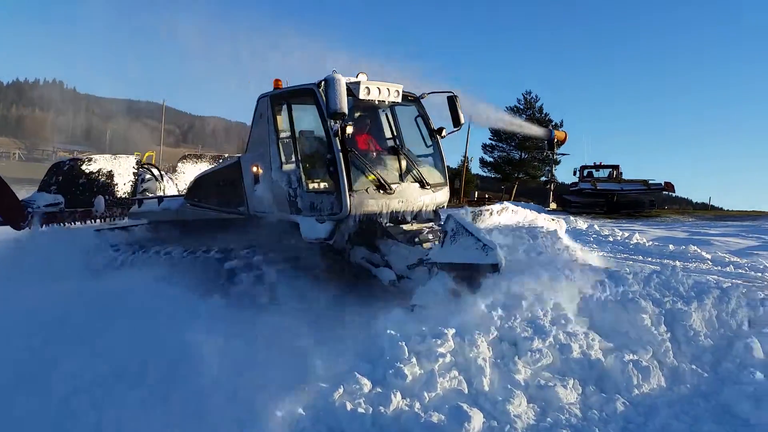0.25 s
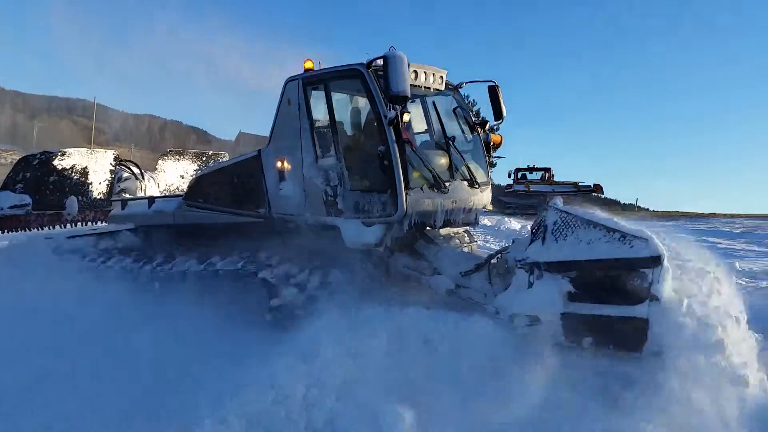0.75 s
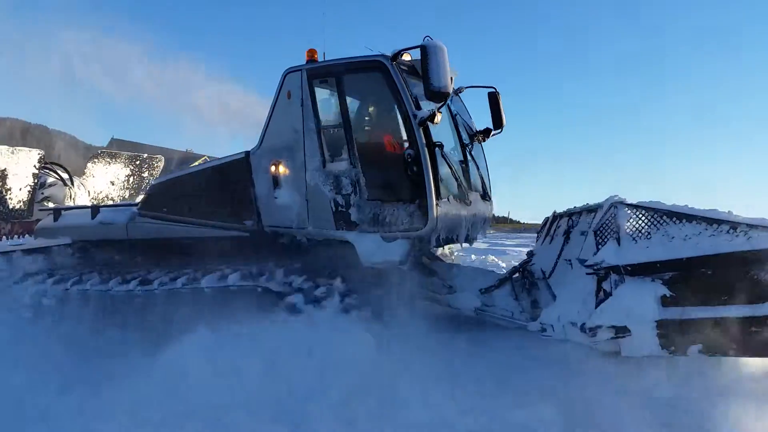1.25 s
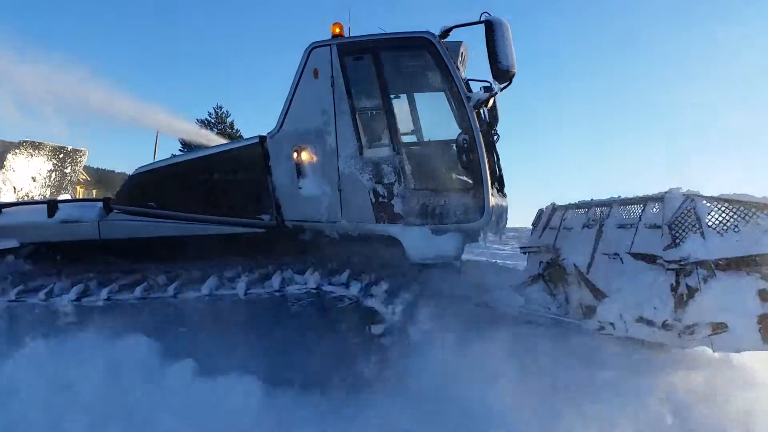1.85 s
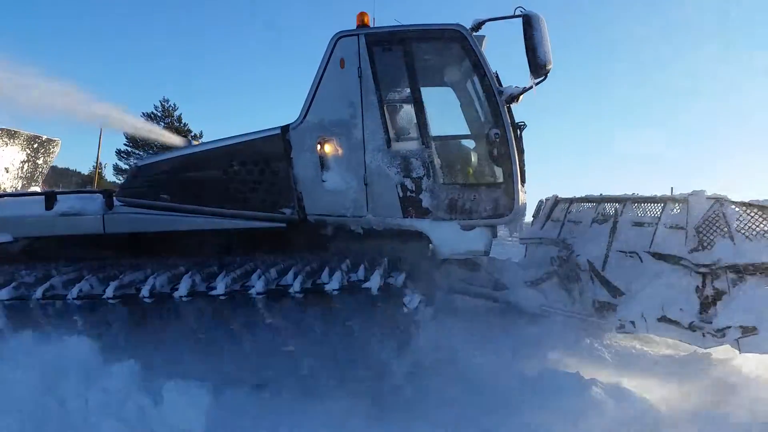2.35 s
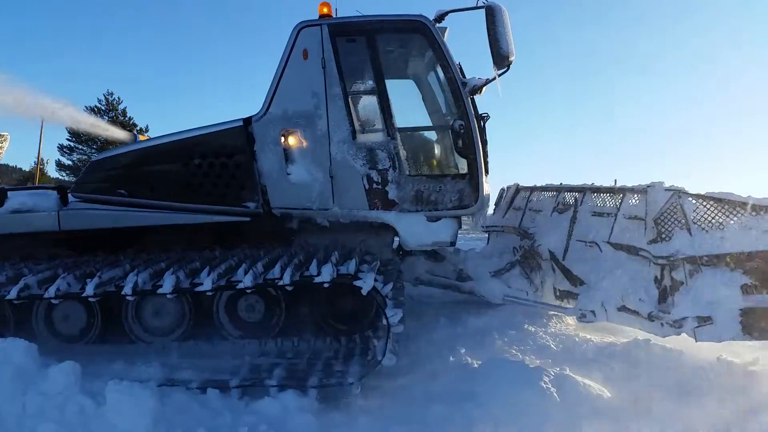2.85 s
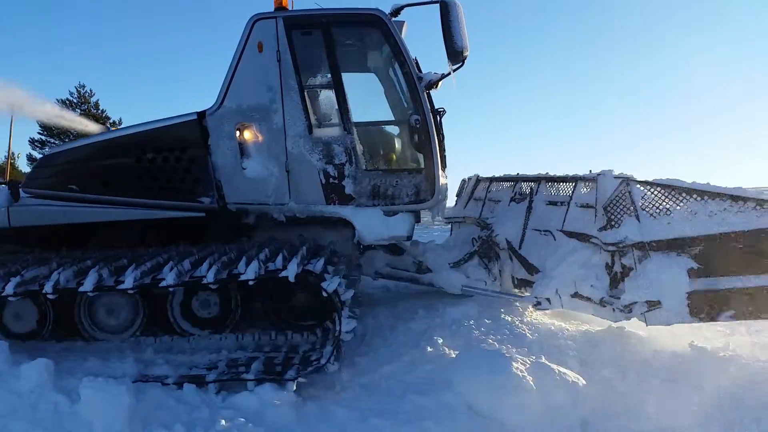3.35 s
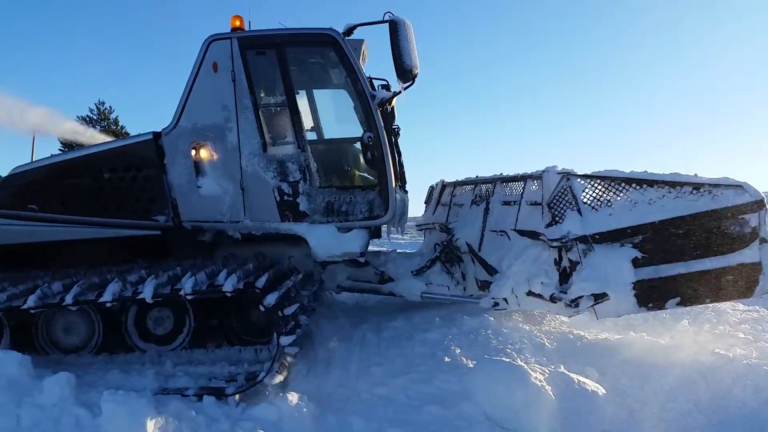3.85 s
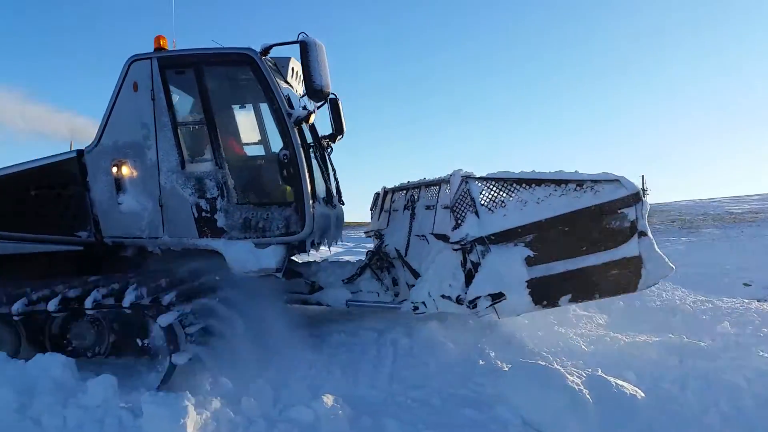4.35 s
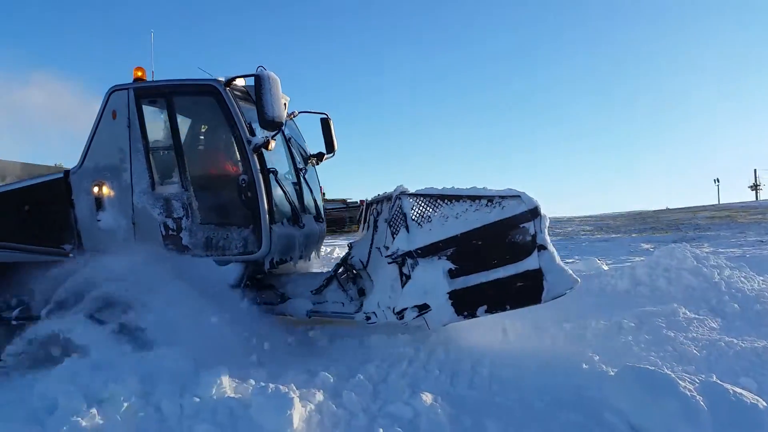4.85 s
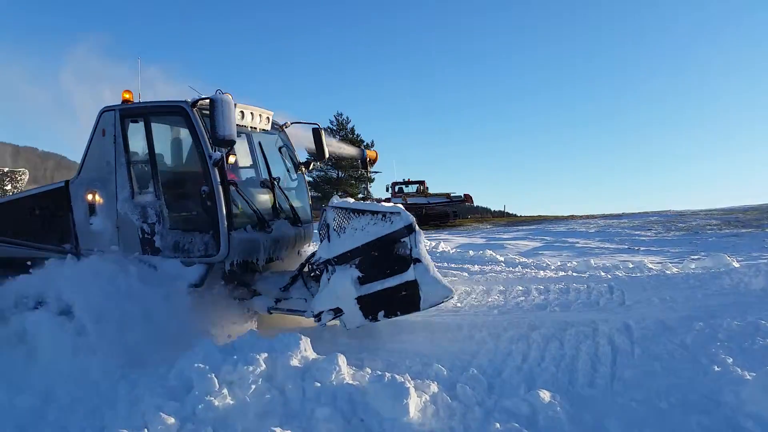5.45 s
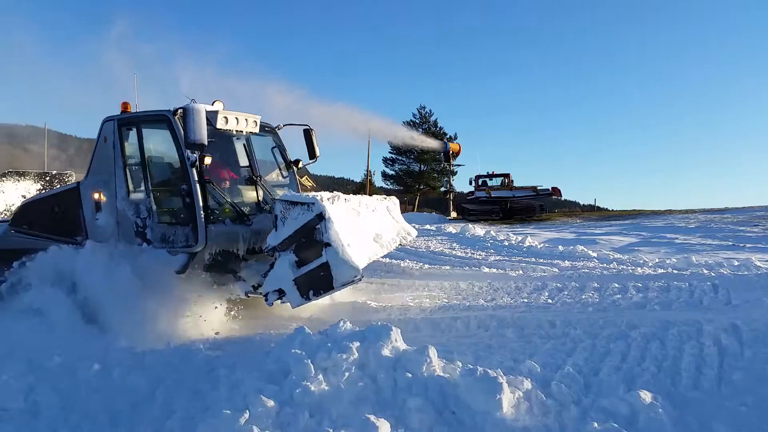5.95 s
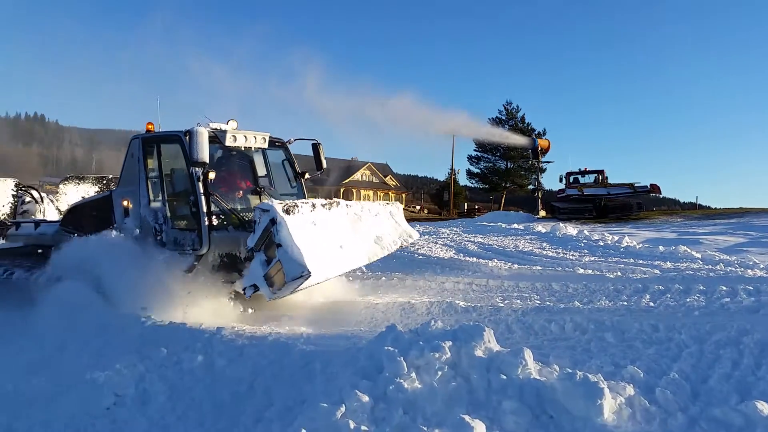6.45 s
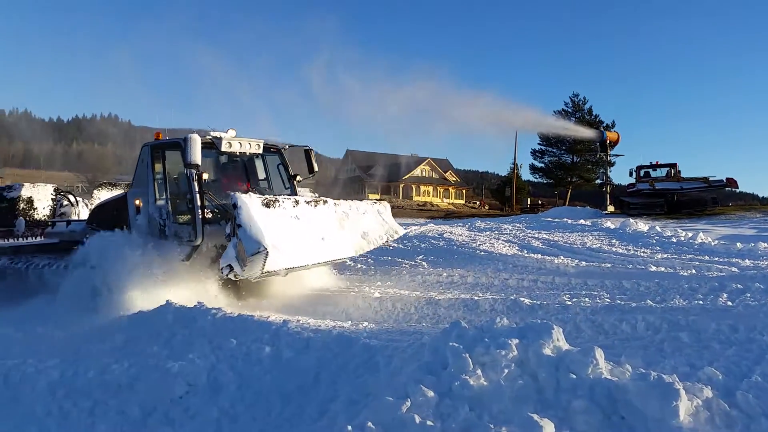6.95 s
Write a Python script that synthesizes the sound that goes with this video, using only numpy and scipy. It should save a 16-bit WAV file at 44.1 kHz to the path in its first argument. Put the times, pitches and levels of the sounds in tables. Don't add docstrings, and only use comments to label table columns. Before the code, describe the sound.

A snow groomer's diesel growls under load with a faint high turbo whistle that slides down as the engine bogs. It picks up with a bark, peaks in a whining roar, then drops back to a steady growl. Crisp snow hiss, cleat knocks and small squeaks follow during reversing. Behind is a wavering fan hum; close stereo phone pickup with rumbling, clipping wind gusts.

```python
import sys
import numpy as np
from scipy import signal
from scipy.fft import rfft, irfft
from scipy.io import wavfile
from scipy.ndimage import uniform_filter1d, minimum_filter1d, map_coordinates

SR = 44100
rng = np.random.default_rng(int(sys.argv[2]) if len(sys.argv) > 2 else 0)


def dump(signal):
    limited = np.clip(np.atleast_2d(signal).T, -1, 1)
    pcm = np.round(limited * 32767).astype(np.int16)
    wavfile.write(sys.argv[1], SR, pcm)


def field_ratio(decibels):
    return 10 ** (np.asarray(decibels, dtype=float) / 20)


N = 316638
TIME = np.arange(N) / SR


def evened(x):
    return x / np.sqrt(np.mean(x ** 2) + 1e-20)


def read(points, hz):
    f, *values = np.transpose(points)
    return np.squeeze([np.interp(np.log(hz + 1), np.log(f + 1), v) for v in values])


def follow(rows, t=TIME):
    s, *columns = np.transpose(rows)
    return [np.interp(t, s, c) for c in columns]


def drift(rate, length=N):
    knots = rng.standard_normal(int(N / SR * rate) + 4)
    places = np.linspace(1, len(knots) - 2, length)
    return evened(map_coordinates(knots, [places], order=2, prefilter=False))


def swell(t, s, length):
    return np.exp(-((t - s) / length) ** 2)


def swells(t, rows):
    return sum(db * swell(t, s, length) for s, length, db in rows)


def shading(t, hz, rows):
    return sum(db * swell(hz, mid_hz, width_hz) * swell(t, s, length)
               for s, length, mid_hz, width_hz, db in rows)


def hump(hz, lo_hz, hi_hz):
    return 1 / (1 + (lo_hz / (hz + 1)) ** 8) / (1 + (hz / hi_hz) ** 8)


def tone(hz, db, lead, left_db, waver_db=-1.0, rate=9):
    turn = 2 * np.pi * (np.cumsum(hz * np.ones(N)) / SR + rng.random())
    level = np.sqrt(2) * field_ratio(db + waver_db * drift(rate))
    left = field_ratio(left_db / 2) * np.sin(turn + lead)
    right = field_ratio(-left_db / 2) * np.sin(turn)
    return level * np.array([left, right])


def whistle(hz, db, width_hz, lead, left_db, steady=.5):
    return tone(hz, db, lead, left_db) * evened(steady + drift(width_hz))


# time in seconds, firing rate in Hz, exhaust effort in dB over the roar.
ENGINE = [(0, 66.7, 10), (.8, 65.75, 8), (1.38, 66.74, 10.5), (1.78, 60.95, 2.5), (2.05, 52.23, 1.5),
          (2.26, 52.04, 7), (2.44, 66.46, 8.5), (2.72, 77.2, 19.5), (2.95, 83.24, 13.5), (3.16, 86.7, 7),
          (3.45, 85.6, -3.5), (3.86, 78.66, 14.5), (4.04, 76, 10.5), (4.34, 69.7, 11), (4.7, 66.2, 11.5),
          (5.3, 63.7, 10.5), (6.2, 64.38, 10.5), (7.18, 64.5, 7)]
# time in seconds, multiple of firing rate, level in dB over the roar.
DRIVE = [(0, 9.47, -2), (.5, 9.45, -3), (.8, 9.35, -5), (1.05, 9.14, -3), (1.4, 9.2, -10), (1.62, 9.3, -3),
         (1.74, 9.3, -9), (1.85, 9.33, -4), (2.2, 9.2, -14), (2.7, 9.0, -9), (3.2, 9.2, -16),
         (4.1, 9.25, -16), (4.9, 9.3, -14), (5.12, 9.35, -5), (5.28, 9.3, -15), (5.45, 9.2, -4),
         (5.6, 9.1, -5), (6.2, 9.32, -6), (6.6, 9.3, -4), (7.18, 9.2, -3)]
# time in seconds, frequency in Hz, level in dB over the roar.
FAN = [(0, 535, -12), (2.0, 579, -20), (2.2, 590, 3), (2.4, 595, -14), (2.6, 664, -0.5), (2.75, 701, 0),
       (2.9, 676, 1), (3.05, 689, 1), (3.3, 692, -1), (3.6, 700, 0), (3.8, 698, 7), (3.9, 680, -10),
       (4.3, 641, -13), (5, 540, -4), (7.18, 516, -18)]
# time in seconds, half length in seconds, change in dB.
STUMBLES = [(2.35, .06, 2), (2.47, 0.034, 6), (2.606, 0.057, -10), (2.676, 0.034, 0), (3.08, .05, 1),
            (3.24, .03, -6), (3.332, 0.079, 5), (3.65, 0.0997, -1), (3.872, 0.058, -0.5), (4.2, .25, 2),
            (1.5, .2, 0), (5.852, .1, 0.5), (4.6, 0.22, 0.5), (6.37, .05, -7), (1.25, 0.089, 2.5),
            (4.946, .08, -1), (5.32, 0.04, -7)]


def engine():
    hz, effort_db = follow(ENGINE)
    drive, drive_db = follow(DRIVE)
    idle_hz = 65
    pump_db = -7.5 + 0.45 * (hz - idle_hz)
    pump_db = pump_db - 8 * swell(TIME, 3.62, .17)
    firing_db = 4.5 - 15 / (1 + np.exp(85.1 - hz))
    firing_db = firing_db + 2.5 * swell(TIME, 7.2, 2.4)
    second_db = effort_db + swells(TIME, STUMBLES)
    third_db = -12 + 22 * swell(TIME, 2.33, 0.11)
    fourth_db = -7.5 + 7.5 * swell(TIME, 4.834, 0.22)
    fifth_db = -18 + 14 * swell(TIME, 3.05, .3)

    hz = hz * (1 + 0.0031 * drift(12))
    out = whistle(hz, firing_db, 18, .15, .1, steady=1.0)
    out += tone(2 * hz, second_db, .35, .1, waver_db=.7, rate=12)
    out += tone(3 * hz, third_db, 0.5, .5, waver_db=0.5)
    out += tone(4 * hz, fourth_db, 1.0, .5, waver_db=-0.5)
    out += tone(5 * hz, fifth_db, .5, .5, waver_db=1.2)
    out += whistle(drive / 2 * hz, pump_db, 18, 0.51, -1.7, steady=3.5)
    out += whistle(drive * hz, drive_db + 1.8, 16, 0.72, 5.5, steady=2.6)
    out += whistle(*follow(FAN), 40, 0.74, 1.4, steady=1.8)
    return out + turbo()


# time in seconds, frequency in Hz, level in dB over the roar.
TURBO = [(0, 10600, -14), (.77, 10300, -14), (1.15, 10100, -12), (1.32, 9950, -8), (1.43, 9800, -13),
         (1.55, 9470, -16), (1.68, 9180, -9), (1.78, 8630, -6), (1.86, 8250, -12), (1.92, 7950, -22),
         (2.0, 7580, -23), (2.1, 7230, -19), (2.16, 7000, -38), (2.22, 6750, -34), (2.27, 6700, -19),
         (2.4, 6600, -45), (2.66, 7400, -40), (2.72, 7450, -17), (2.78, 7480, -22), (2.88, 7430, -24),
         (2.97, 7390, -22), (3.03, 7440, -32), (3.12, 7490, -19), (3.3, 7340, -22), (3.38, 7250, -32),
         (3.47, 7150, -24), (3.55, 7100, -45)]


def turbo():
    hz, db = follow(TURBO)
    flutter_hz = 27 * drift(150)
    return whistle(hz + flutter_hz, db, 260, 1.5, 19, steady=1.6)


# time in seconds, roar level in dB.
ROAR = [(0, -41), (.1, -34), (.24, -38.5), (1.0, -38.5), (1.32, -32), (1.8, -29.5), (2.1, -32),
        (2.3, -30.5), (3.3, -29.5), (3.62, -31), (3.76, -33), (4.16, -41), (4.6, -36.5), (5.0, -31.5),
        (5.28, -31), (5.6, -33.5), (6.8, -33.5), (7.05, -38)]
# time in seconds, half length in seconds, change in dB.
SPRAYS = [
    (.03, 0.099, 4),
    (2.016, .05, 1),
    (2.408, 0.26, 3.5),
    (3.323, 0.071, 5),
    (5.469, .13, 3.5),
    (6.12, 0.11, 3),
    (6.323, 0.098, 3),
    (6.55, 0.11, 7),
    (7.097, 0.22, 5.5),
]
# time in seconds, half length in seconds, change in dB.
SLIPS = [
    (0.898, 0.065, 2.5),
    (1.8, 0.58, 2),
    (2.865, .07, -0.5),
    (3.42, 0.053, 3),
    (4.896, 0.24, 5),
    (5.367, 0.067, 4),
    (5.897, 0.22, 4),
]
# time in seconds, half length in seconds, frequency in Hz, half width in Hz, change in dB.
SHADES = [(3.4, 0.95, 1670, 62, 5.5), (2.2, 3.9, 1440, 83, -5), (5.48, .15, 14000, 700, 4),
          (6.6, .15, 13740, 700, 9), (6.2, .3, 11500, 500, -4), (6.2, .3, 11350, 500, -1),
          (6.5, .3, 15000, 900, 6), (5.3, .25, 8700, 400, 1.5), (3.73, 0.58, 680, 110, 5.5),
          (6.95, 0.45, 10700, 410, -10), (6.3, 0.37, 11800, 590, 7), (5.013, 0.59, 2230, 150, 3),
          (6.5, 0.49, 5600, 1200, -1), (4.57, 0.24, 9000, 326, 6), (5.7, 0.41, 2870, 150, -1),
          (2.84, 0.31, 560, 82, 3), (3.7, 0.12, 470, 80, 3), (5.0, 0.32, 1830, 280, 1),
          (5.2, .5, 3750, 140, 2.5), (5.95, 0.16, 260, 50, 3.5)]
# time in seconds, half length in seconds, frequency in Hz, half width in Hz, change in dB.
LEFT_SHADES = [(6.7, .6, 11600, 350, -6), (6.57, .1, 13000, 700, 1), (6.57, 0.076, 10000, 500, 4),
               (6.5, .4, 14100, 300, -3), (6.3, .2, 12800, 600, -1), (5.45, .15, 14000, 700, 5),
               (5.0, .25, 14500, 1200, 5), (4.47, 0.24, 12500, 1500, 0), (5.3, .6, 2700, 348, -5),
               (5.49, 0.36, 4200, 610, 0), (6.55, .15, 6600, 294, 0), (4.5, 0.33, 4900, 650, 2),
               (4.75, 0.15, 1900, 740, 1.5), (6.04, .3, 5300, 500, 4)]
# frequency in Hz, level in dB per Hz.
LEFT = [
    [(30, -2), (120, 11), (300, 9), (700, 6), (850, -2), (1030, 4), (1790, 0.5), (2590, -16), (3820, -6),
     (5650, -22), (7880, -14), (9030, -5.5), (11190, -10.5), (15600, -7.5)],
    [(30, 10.5), (120, 16.5), (300, 7.5), (700, 6.5), (850, -2), (1030, 2.5), (1890, 2.5), (2910, -12),
     (4560, -12.5), (6740, -21), (7430, -15.5), (8680, -7), (11410, -10.5), (15600, -16)],
]
# frequency in Hz, level in dB per Hz.
RIGHT = [(30, 8.5), (120, 16), (300, 5), (720, 2.5), (1030, -3.5), (1890, -6), (2800, -24), (3780, -12.5),
         (6200, -27), (8100, -83), (9400, -92), (12300, -12.5), (14500, -7.5), (15600, -6.5)]
# frequency in Hz, likeness 0-1, radians by which left leads.
PORTS = [(60, 1, -0.46), (152, 1, 0.17), (506, 0.89, -0.059), (1140, 0.51, 0.17), (2060, 0.69, 0.44),
         (2300, 0.2, -2), (3740, 0.66, 0.98), (6200, 0.059, -0.51)]
# time in seconds, samples right arrives late, share of machine-behind colour 0-1.
LAG = [(0, 4.2, 0.55), (1.2, 4.8, 0.32), (2.4, 4.9, 0.12), (3.2, 6.1, 0.07), (3.8, 8.1, 0.14),
       (4.4, 11.6, 0.74), (5.2, 12, 1), (6, 11.33, 0.76), (7.18, 12.4, 1)]


def roar():
    hop, size = 128, 1024
    frames, hz = N // hop + 9, np.fft.rfftfreq(size, 1 / SR)[:, None]
    t = np.arange(frames) * hop / SR
    a, b, c, d, patches = rng.standard_normal((frames, len(hz), 5)).T
    patches = evened(uniform_filter1d(uniform_filter1d(patches, 14, 0), 30, 1))

    usual_db = -34
    near_db = follow(ROAR, t)[0] - usual_db
    body_db = (0.95 - 1) * near_db
    hiss_db = (1.15 - 1) * near_db + swells(t, SLIPS)
    spray_db = (0.61 - 1) * near_db - 2.4 + swells(t, SPRAYS)
    spray_db = spray_db * hump(hz, 7000, 30000) * (hz / 13000) ** 0.55

    db = 0.91 * patches + body_db * hump(hz, 220, 1170) + hiss_db * hump(hz, 4800, 11700)
    db = db + 0.6 * drift(45, frames) * hump(hz, 2600, 30000)
    db = db + 0.71 * drift(40, frames) * hump(hz, 6100, 30000)
    fine_db = 0.97 * drift(60, frames) + 0.36 * drift(70, frames)
    db = db + fine_db * hump(hz, 10000, 30000)
    cleats_per_s = 21.3
    throb_db = 1.67 * swell(t, 5, 1.06) * np.cos(2 * np.pi * cleats_per_s * (t - 5.035))
    db = db + throb_db * hump(hz, 3000, 12000)
    db = db + shading(t, hz, SHADES)

    late, behind = follow(LAG, t)
    left_db = (1 - behind) * read(LEFT[0], hz)[:, None] + behind * read(LEFT[1], hz)[:, None]
    left_db = left_db + 0.54 * spray_db + shading(t, hz, LEFT_SHADES)
    right_db = read(RIGHT, hz)[:, None] + spray_db

    same, lead = read(PORTS, hz[:, 0])[:, :, None]
    same = np.clip(same, 0, 1)
    lead = lead + 2 * np.pi * np.minimum(hz, 5000) * late / SR
    left = a + 1j * b
    right = same * left * np.exp(-1j * lead) + np.sqrt(1 - same ** 2) * (c + 1j * d)
    z = np.array([left * field_ratio(left_db), right * field_ratio(right_db)]) * field_ratio(db)
    noise = signal.istft(z, nperseg=size, noverlap=size - hop)[1][:, :N]
    return field_ratio(12.0) * evened(noise)


def clatter(noise):
    turns = np.cumsum(2 * follow(ENGINE)[0]) / SR
    treble = signal.sosfiltfilt(signal.butter(2, 1500, "high", fs=SR, output="sos"), noise)
    return noise + 0.068 * np.cos(2 * np.pi * turns) * treble


# start in seconds, level in dB, frequency in Hz.
SQUEAKS = [(2.36, -23, 10200), (4.5531, -31, 8970), (4.6165, -41, 9230), (4.703, -31, 9190),
           (4.8394, -47, 8490), (4.9398, -28, 8410), (4.9791, -35, 9410), (5.0275, -25, 8520),
           (5.067, -28, 8550), (5.3059, -31, 9280), (5.4241, -26, 8710), (5.6984, -26, 9000),
           (5.7818, -22, 9800)]


def squeaks():
    out = np.zeros(N)
    t = np.arange(round(28 * SR / 1000)) / SR
    window = np.sin(np.pi * np.sqrt(t / t[-1])) ** 2
    for s, db, hz in SQUEAKS:
        wobble = 1 + .16 * uniform_filter1d(rng.standard_normal(4000), 60)[:len(t)]
        chirp = field_ratio(db - 1.0) * np.sin(2 * np.pi * hz * np.cumsum(wobble) / SR) * window
        out[round(s * SR):][:len(t)] += chirp
    return out * field_ratio([[0], [-24]])


# start in seconds, peak level in dB.
KNOCKS = [(0.0263, -42), (0.0762, -38), (0.5506, -43), (1.5723, -25), (3.5593, -24), (3.664, -22),
          (3.8821, -29), (4.5266, -36), (4.6773, -26), (4.7775, -23), (4.8793, -24), (5.019, -23),
          (5.1602, -29), (5.2495, -21.5), (5.2954, -25), (5.3951, -35), (5.435, -23), (5.477, -22),
          (5.6116, -40), (5.656, -29), (5.7427, -27), (5.786, -21), (5.8217, -30), (6.0826, -32),
          (6.4446, -31), (6.4822, -35)]


def knocks():
    puffs = sum(field_ratio(db - 10.5) * swell(TIME, s + 0.005, 0.0045) for s, db in KNOCKS)
    band = signal.butter(2, [1600, 5000], "band", fs=SR, output="sos")
    noise = signal.sosfilt(band, rng.standard_normal((2, N)))
    noise = signal.lfilter(*signal.iirnotch(3100, 3100 / 470, SR), noise)
    return puffs * evened(noise) * field_ratio([[2.5], [-4]])


# frequency in Hz, level in dB.
GUN = [(745.7, 0), (736, -10), (760, -21)]
# time in seconds, level in dB over the roar, radians by which left leads.
GUN_PATH = [(0, 3, 1.4), (.8, 3, 1.55), (1.3, -0.5, 1.1), (2.2, 0, 0.18), (2.8, -5.5, .1), (3.8, -3, 1.134),
            (4.2, -2.5, 0.057), (4.8, -3.5, 0.37), (5.3, -2.5, 0.63), (5.8, 2.5, 1.7), (6.5, 3.5, 1.2),
            (7.18, 6.5, 1.6)]
# frequency in Hz, level in dB.
GUN_MOTOR = [(404, -9), (938, -19), (990.5, -18), (1324, -20)]
# time in seconds, level in dB over the roar.
MOTOR_PATH = [(0, -5), (.9, 2.5), (1.4, 1), (2.2, -1), (3.5, -0.5), (4.5, 3.5), (5.4, 4), (5.8, 3),
              (6.3, 3), (6.65, 7), (7.18, 6.5)]


def snow_gun():
    path_db, lead = follow(GUN_PATH)
    motor_db = follow(MOTOR_PATH)[0]
    blades = sum(tone(hz, db + path_db + 2.2, lead, 8.3, waver_db=1.2, rate=3.8) for hz, db in GUN)
    motor = sum(whistle(hz, db + motor_db, 9, lead, 6, steady=2.5) for hz, db in GUN_MOTOR)
    return blades + motor


# frequency in Hz, level in dB per Hz.
GUST = [(15, -37), (30, -9.5), (60, 2.5), (130, 2), (250, -8), (420, -22), (700, -23), (1500, -94)]
# frequency in Hz, level in dB per Hz.
FLUTTER = [(60, -35), (150, 3), (280, 0), (420, -6.5), (600, -14), (1500, -97)]
# start in seconds, length in seconds, port (0 left), level in dB.
BURSTS = [(0, 0.02, 1, -12), (0.132, 0.17, 1, -15.5), (0.057, 0.11, 0, -22), (0.032, .09, 1, -26),
          (0.247, .08, 1, -18.5), (2.097, 0.074, 0, -22), (2.512, 0.16, 1, -38), (2.801, 0.073, 1, -26),
          (2.83, 0.063, 0, -17), (3.01, 0.092, 0, -15), (3.294, 0.18, 0, -22), (3.75, 0.063, 1, -21),
          (3.764, 0.18, 0, -23), (5.576, 0.064, 1, -34), (5.84, 0.219, 1, -19.5), (5.981, 0.18, 0, -31),
          (6.9, 0.18, 1, -18.5), (7.037, 0.068, 0, -25)]
# time in seconds, port (0 left), peak in dB before the limiter, width in ms, sign.
BLOWS = [
    (0.144, 1, -0.5, 3.2, 1),
    (0.185, 1, 2.5, 1.8, 1),
    (3.07, 0, 0.5, 1.5, -1),
    (3.654, 0, 6, 2.1, -1),
    (5.926, 1, 0.5, 2.2, 1),
    (6.953, 1, 4.5, 2.7, -1),
    (7.0, 1, 3, 2.4, 1),
]


def wind():
    gust_db, bursts = gusts(), np.zeros((2, N))
    for s, length, port, db in BURSTS:
        bursts[int(round(port))] += field_ratio(db) * ((TIME > s) & (TIME < s + length))
    flutter = field_ratio(gust_db - 15.5) + uniform_filter1d(bursts, size=900)
    out = eddies(GUST, 700) * field_ratio(gust_db) + eddies(FLUTTER, 250) * flutter
    out = .75 * np.tanh(out / .75)
    for s, port, db, ms, sign in BLOWS:
        u = (np.arange(-600, 600) / SR) / (ms / 1000)
        lobe = (1 - u ** 2) * np.exp(-u ** 2 / 2)
        out[int(round(port)), round(s * SR) - 600:][:1200] += np.sign(sign) * field_ratio(db) * lobe
    return out


# time in seconds, level in dB.
BREEZE = [(0, -20.5), (3.2, -32.5), (3.95, -29), (4.3, -46), (4.7, -33), (5.2, -19.5), (6.5, -21),
          (7.18, -21)]
# time in seconds, port (0 left), level in dB, half length in seconds.
GUSTS = [(0, 1, -10.5, 0.095), (0.095, 0, -13.5, 0.093), (0.2, 1, -9, 0.11), (.4, 0, -23, 0.16),
         (1.16, 0, -25, 0.089), (1.331, 1, -21, 0.25), (1.6, 0, -15.5, 0.19), (1.878, 0, -17, 0.078),
         (1.949, 1, -22.5, 0.22), (2.1, 0, -11, 0.035), (2.338, 0, -24, 0.077), (2.513, 0, -19.5, .07),
         (2.54, 1, -14.5, 0.18), (2.8, 1, -15, 0.17), (2.971, 0, -16, 0.42), (3.404, 0, -14, 0.14),
         (3.498, 1, -20, .06), (3.674, 0, -4.5, 0.037), (3.771, 1, -21, 0.046), (3.83, 0, -10, 0.065),
         (5.033, 0, -16, 0.1), (5.3, 1, -19.5, .1), (5.37, 0, -17, 0.071), (5.627, 1, -10.5, 0.11),
         (5.655, 0, -12.5, 0.06), (5.907, 1, -12, 0.24), (6.1, 0, -12, .14), (6.75, 0, -21, 0.051),
         (7.003, 1, -10.5, .11), (7.122, 0, -15.5, 0.11)]


def gusts():
    power = np.ones((2, 1)) * field_ratio(2 * follow(BREEZE)[0])
    for s, port, db, length in GUSTS:
        power[int(round(port))] += field_ratio(2 * db) * swell(TIME, s, length) ** 2
    return 10 * np.log10(power)


def eddies(colour, per_s):
    sizes = field_ratio(1.6 * np.minimum(rng.exponential(1, (2, N)), 4))
    pushes = sizes * (rng.random((2, N)) < per_s / SR)
    pushes *= rng.choice([-1., 1.], (2, N))
    spectrum = rfft(pushes) * field_ratio(read(colour, np.fft.rfftfreq(N, 1 / SR)))
    return evened(irfft(spectrum, N))


# time in seconds, half length in seconds, change in dB.
SAGS = [
    (0.197, 0.051, -2.5),
    (2.12, 0.026, -2),
    (2.872, 0.07, -3),
    (3.09, 0.043, -3),
    (3.417, 0.09, -2.5),
    (3.825, 0.041, -4.5),
    (5.196, 0.033, -1),
    (5.364, 0.038, -0.5),
    (5.955, 0.17, -2.5),
    (6.966, 0.043, -0.5),
]


def scene():
    roar_db = follow(ROAR)[0]
    tones = (engine() + snow_gun()) * field_ratio(uniform_filter1d(roar_db, size=9000))
    machines = clatter(roar()) * field_ratio(roar_db) + tones
    return machines * field_ratio(swells(TIME, SAGS)) + wind() + squeaks() + knocks()


def top_cut(x):
    return signal.sosfilt(signal.butter(12, 17090, fs=SR, output="sos"), x)


def record(dry):
    over_db = np.maximum(20 * np.log10(abs(dry).max(0) + 1e-9) + .5, 0)
    held_db = -minimum_filter1d(-over_db, size=801)
    fall = 300 * TIME
    held_db = np.maximum.accumulate(held_db + fall) - fall
    slow = 26 * TIME
    held_db = np.maximum(held_db, np.maximum.accumulate(0.38 * held_db + slow) - slow)
    ducked = dry / field_ratio(uniform_filter1d(held_db, size=500))
    edge = signal.firwin(801, 15780, window=("kaiser", 10), fs=SR)[None]
    mix = signal.oaconvolve(ducked, edge, "same")
    return top_cut(mix)


dry = scene()
out = record(dry)
dump(out)
```